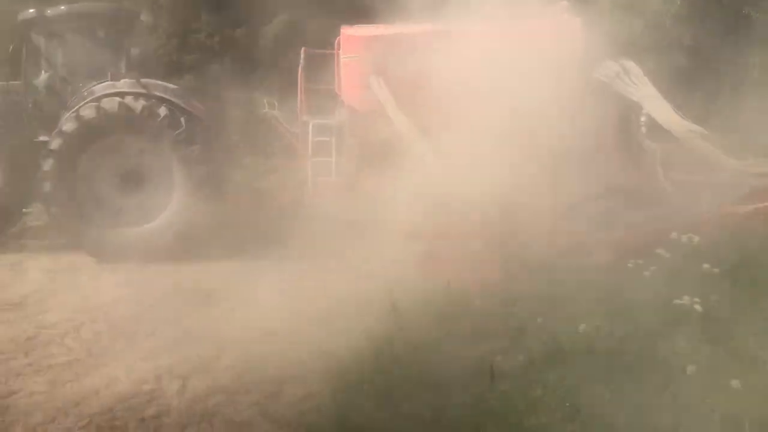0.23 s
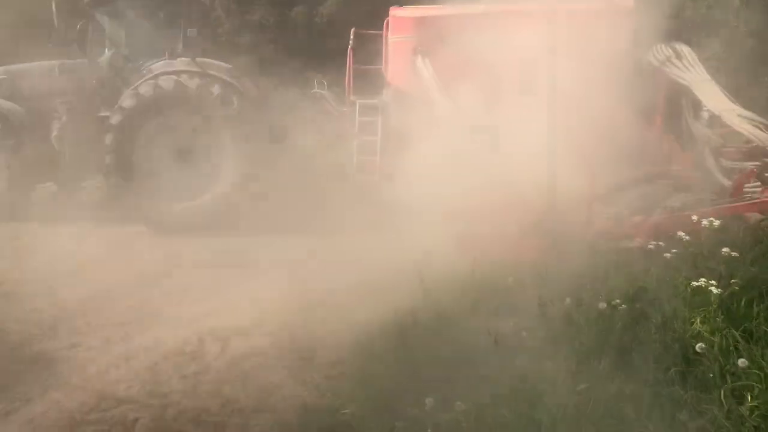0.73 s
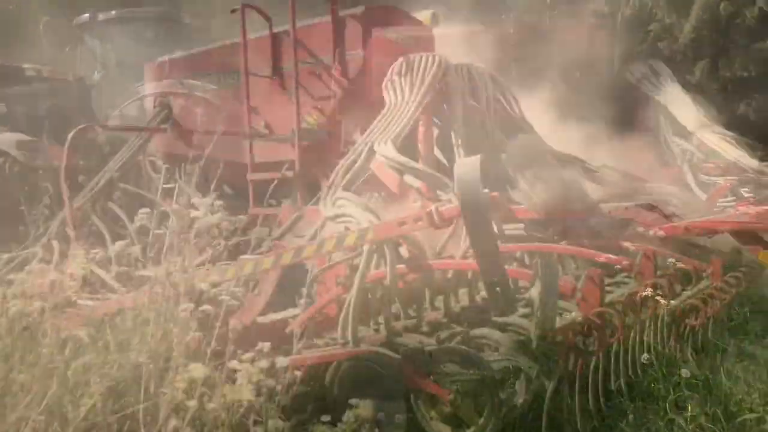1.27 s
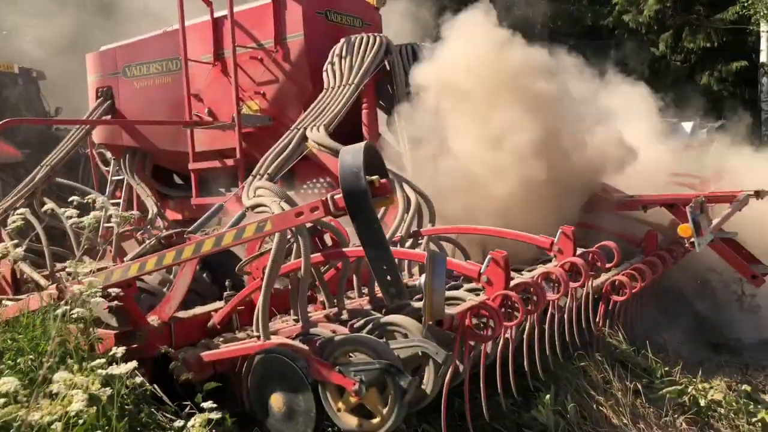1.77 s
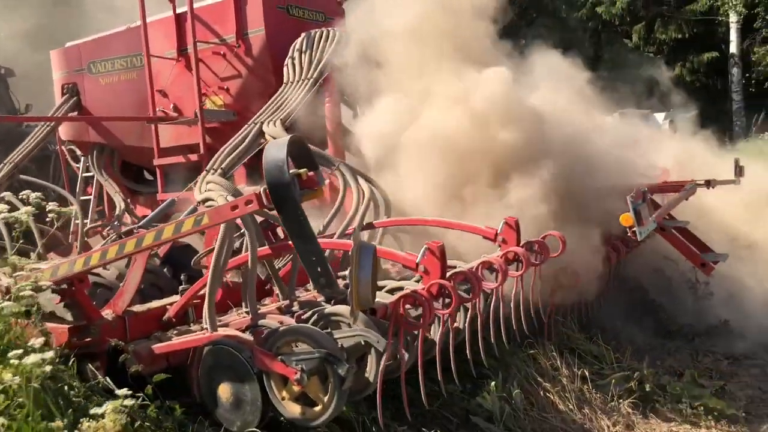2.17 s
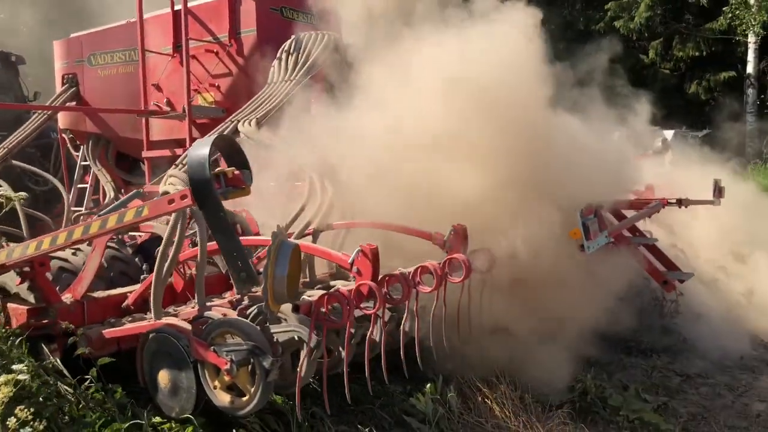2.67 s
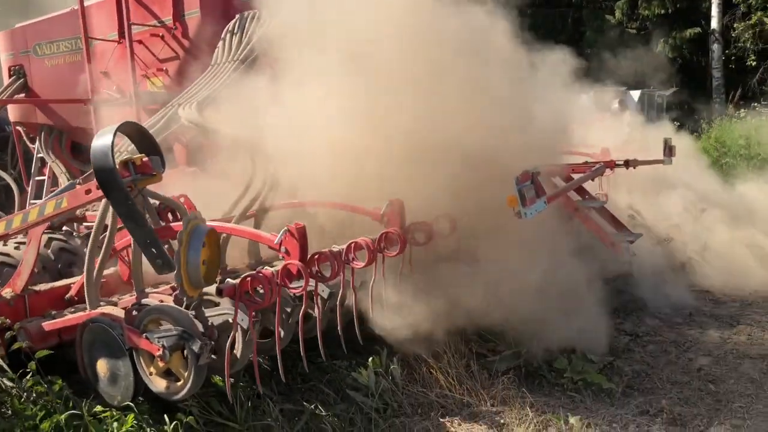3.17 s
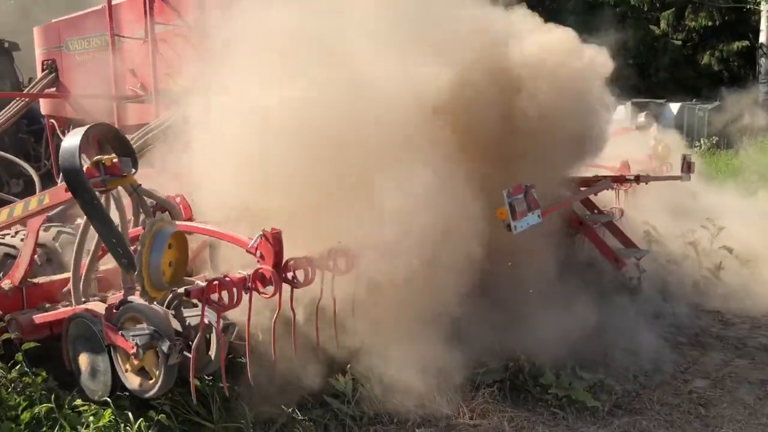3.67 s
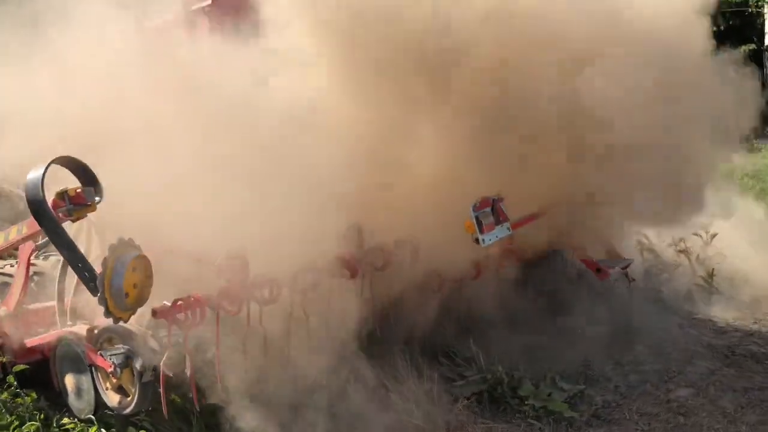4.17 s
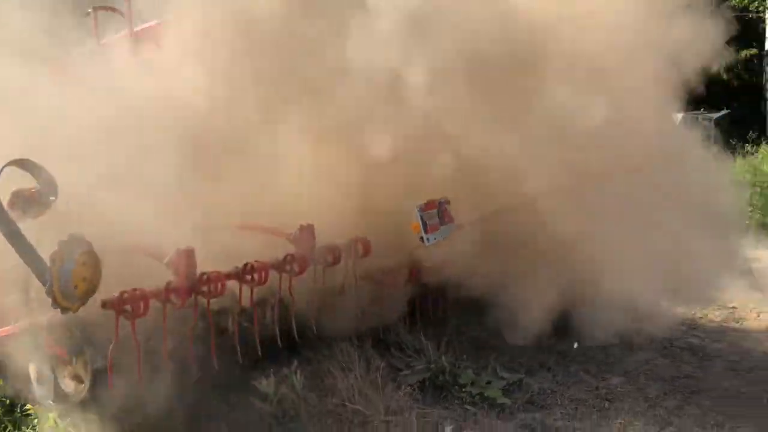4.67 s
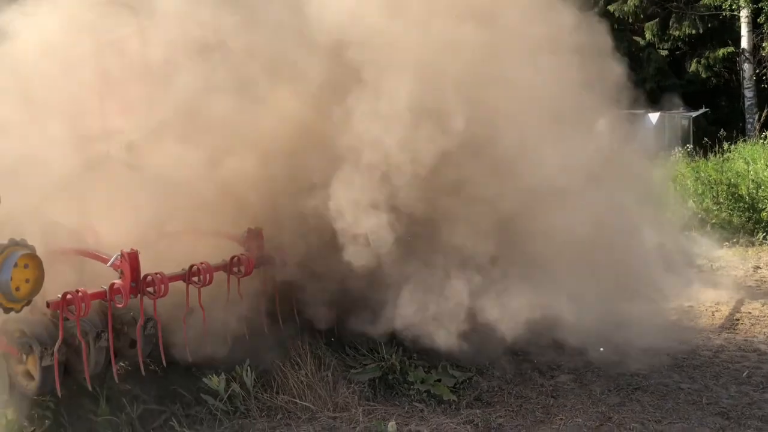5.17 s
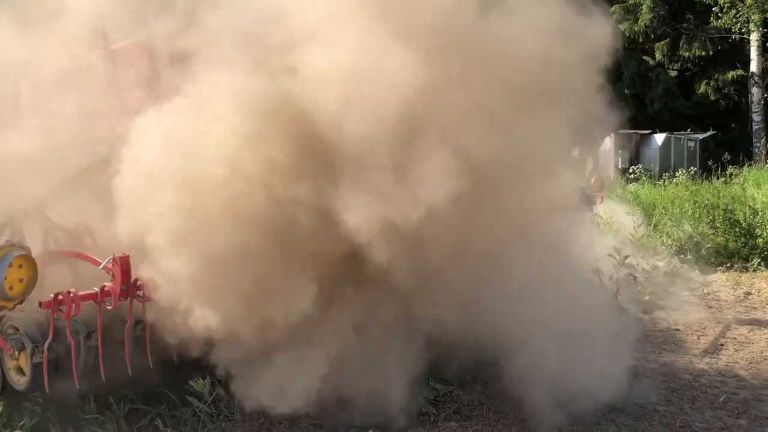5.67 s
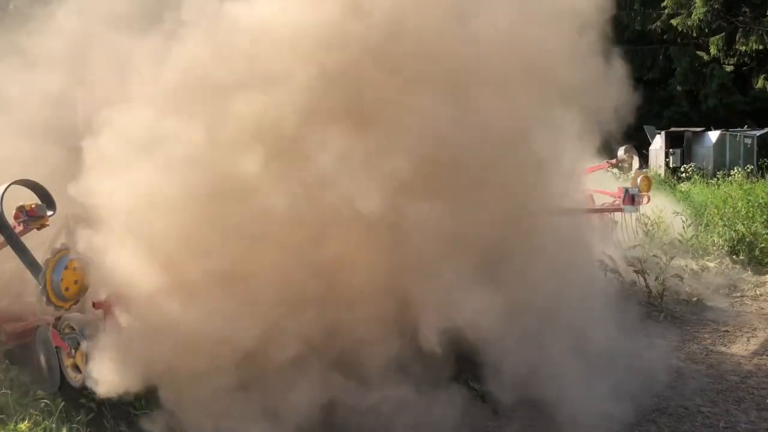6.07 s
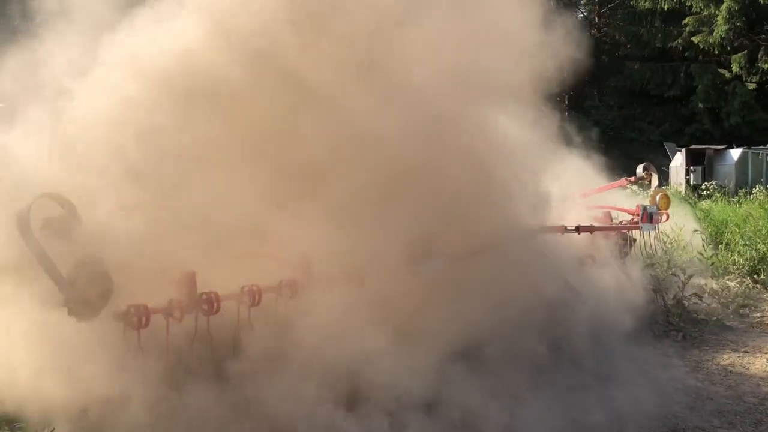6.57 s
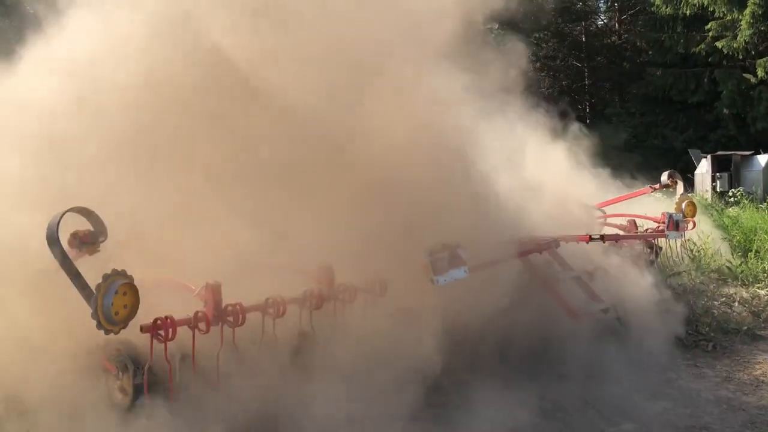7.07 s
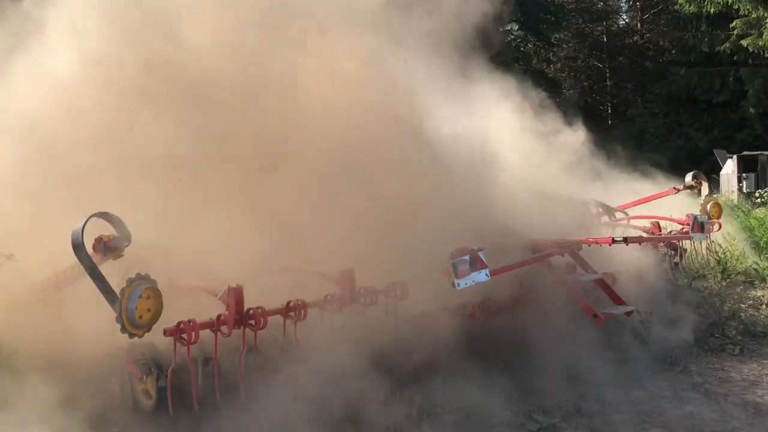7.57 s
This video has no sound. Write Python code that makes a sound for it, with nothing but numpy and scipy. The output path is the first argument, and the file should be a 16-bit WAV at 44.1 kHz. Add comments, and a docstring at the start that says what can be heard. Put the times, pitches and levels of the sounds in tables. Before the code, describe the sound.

A forceful air lance blows dust from farm machinery in the open. Its dense high hiss constantly flickers and sputters, peppered with fine grit ticks, while rapid blasts resonate in metal hollows and low air buffets underneath. The loudest rushes come before five seconds, then shorter puffs and a softer hiss let the steady diesel show through. Close, mono, dry outdoor pickup with compressed peaks.

```python
"""A compressed-air lance hisses throughout, blowing dust off a seed drill outdoors, near a running diesel.
The jet is coloured noise with small ticks of grit; echoes from the machine ripple its sound.
Where it meets the frame it roars in the hollows and splashes on steel, both made of ringing noise.
A tube end whistles faintly, the spent air buffets low down, and the engine is a stack of steady tones.
One microphone hears it all; the recorder turns down loud stretches."""
import sys
import numpy as np
from scipy import signal
from scipy.fft import rfft, irfft, next_fast_len
from scipy.io import wavfile
from scipy.ndimage import uniform_filter1d, minimum_filter1d, map_coordinates

SR = 44100
rng = np.random.default_rng(int(sys.argv[2]) if len(sys.argv) > 2 else 0)


def bounce(signal):
    """Save signal as a 16-bit WAV file at the path given by the first command-line argument."""
    frames = np.transpose(np.atleast_2d(signal))
    limited = np.clip(frames, -1, 1)
    pcm = np.round(limited * 32767).astype(np.int16)
    wavfile.write(sys.argv[1], SR, pcm)


N = 344421
TIME = np.arange(N) / SR  # s
FREQ = np.fft.rfftfreq(N, 1 / SR) + 1e-3  # Hz, kept just above zero so that it can be divided by


def undb(db):
    """Turn decibels into a plain gain."""
    return 10 ** (np.asarray(db) / 20)


def unit(x):
    """Scale to an average strength (rms) of 1."""
    return x / np.std(x)


def controls(table):
    """Join the points of each column with straight lines, sample by sample."""
    s, *columns = np.transpose(table)
    return [np.interp(TIME, s, column) for column in columns]


def shape(x, response):
    """Filter a sound by a response given on FREQ."""
    size = next_fast_len(N + SR // 10)  # spare room for ringing past the end
    gain = np.interp(np.fft.rfftfreq(size, 1 / SR), FREQ, response)
    return irfft(rfft(x, size) * gain, size)[:N]


def colour(points):
    """Response through f/Hz, level/dB points, silent outside them."""
    hz, db = np.transpose(points)
    return undb(np.interp(np.log(FREQ), np.log(hz), db, left=-np.inf, right=-np.inf))


def resonance(hz, width):
    """A resonator lets its own pitch through fully and less and less on either side."""
    return 1 / (1 + 1j * (FREQ / hz - hz / FREQ) * hz / width)


def walk(rate):
    """Smooth chance with spread 1 that changes about rate times a second."""
    return unit(shape(rng.standard_normal(N), np.exp(-(FREQ / rate) ** 2)))


def turbulence(flutter_db, rate):
    """Noise that comes in uneven eddies."""
    return unit(rng.standard_normal(N) * undb(flutter_db * walk(rate)))


def grit(rate, spread_db):
    """Ticks of flying grains, about rate a second: many small, a few large."""
    chance = rng.random(N)
    size = rng.exponential(size=N)
    tick = undb(spread_db * np.minimum(size, 5))
    return unit((chance < rate / SR) * tick * rng.choice([-1, 1], N))


def ring(modes, wander_db):
    """Each resonance is blown by its own eddies and swells as the jet moves over it."""
    out = 0
    for hz, width, db in modes:
        # squared response: steep skirts, dark between the resonances
        voice = unit(shape(rng.standard_normal(N), resonance(hz, 2 * width) ** 2))
        out = out + voice * undb(db + wander_db * walk(12.4))
    return unit(out)


def tuned_hollow(hz, width):
    """A single blown resonance whose pitch moves: slow noise carried on a gliding tone."""
    phase = 2 * np.pi * np.cumsum(hz) / SR
    slow = 1 / (1 + 1j * FREQ / width) ** 2
    in_phase = shape(rng.standard_normal(N), slow)
    quadrature = shape(rng.standard_normal(N), slow)
    return unit(in_phase * np.cos(phase) + quadrature * np.sin(phase))


def swell(start, length, edge_s):
    """Attack, hold and release of one event, from 0 to 1 and back."""
    reach = np.array([start - 8 * edge_s, start + length + 8 * edge_s])
    near = slice(*np.clip(reach * SR, 0, N).astype(int))
    age = TIME[near] - start
    opening = (1 + np.tanh(age / edge_s / 2)) / 2
    closing = (1 + np.tanh((length - age) / edge_s / 2)) / 2
    out = np.zeros(N)
    out[near] = opening * closing
    return out


def events(table, edge_s, edge_share):
    """Gains of a table's main layer and of its relative layers; longer events have softer edges."""
    power = np.zeros((len(table[0][2:]), N))
    for start, length, db, *relative_db in table:
        opening = swell(start, length, edge_s + edge_share * length)
        for layer, layer_db in zip(power, (0, *relative_db)):
            layer += opening * undb(db + layer_db) ** 2
    return np.sqrt(power)


def delayed(x, ms):
    """The sound after a path whose length may change."""
    return map_coordinates(x, [np.arange(N) - ms * SR / 1000], order=3)


# two panels that mirror the hiss: delay/ms when the retreat starts, growth of the delay/(ms per s),
# echo strength (0-1)
MIRRORS = [(.65, .75, .2), (.455, .45, .16)]
RETREAT_START_S, RETREAT_LENGTH_S, RETREAT_EDGE_S = 3.05, 0.4, .015


def panels(x):
    """Two close mirrors: their echoes come later and later as the nozzle draws away."""
    facing = swell(RETREAT_START_S, RETREAT_LENGTH_S, RETREAT_EDGE_S)
    echoes = 0
    for ms, ms_per_s, strength in MIRRORS:
        echoes = echoes + strength * delayed(x, ms + ms_per_s * (TIME - RETREAT_START_S))
    return x + facing * echoes


def scatter(x, echo_db, drift_ms, count):
    """Bars and tines send back weak echoes that shift as the lance moves and ripple the spectrum."""
    paths_ms = np.geomspace(1.1, 9, count) * rng.uniform(.9, 1.1, count)
    echoes = sum(delayed(x, ms + drift_ms * walk(1.8)) for ms in paths_ms)
    return (x + undb(echo_db) * echoes) / np.sqrt(1 + count * undb(echo_db) ** 2)


def eddies(points):
    """One scale of eddies: coloured noise with grit in it, sputtering a little."""
    noise = rng.standard_normal(N) + undb(-17) * grit(rate=390, spread_db=3)
    return unit(shape(noise, colour(points))) * undb(1.27 * walk(20))


# the free jet as the lance is carried along: t/s, hiss level/dB,
# then relative to the hiss: sizzle on top level/dB, lower shoulder level/dB
JET_PATH = [(0, -21.5, -4, -7), (.5, -19.5, -0.5, -12), (.9, -23, -1, -8.5), (1.1, -17, -1.5, -9),
            (1.45, -22.5, -3, -8), (1.84, -24, -15, -1), (1.93, -28, 0, -2.5), (2.17, -19, -5, -5),
            (2.85, -19.5, -5, -5.5), (3.38, -24.5, -3, -4.5), (3.46, -21.5, -8, -6), (3.6, -21.5, -3, -2),
            (4.4, -16, -11, -5.5), (4.8, -22, -8, -6.5), (4.86, -28, -6, -8), (4.97, -25, -8, -8),
            (5.05, -20.5, -8, -3.5), (5.4, -20, -7.5, -8), (5.85, -21.5, -7, -8.5),
            (6.02, -25.5, -2.5, -11), (6.35, -26.5, -4.5, -5.5), (7.45, -29.5, -4, -6),
            (7.81, -24.5, -3.5, -8)]
# the hiss flares where the jet catches an edge: start t/s, length/s, hiss level/dB,
# then relative to it: sizzle level/dB, shoulder level/dB
EDGE_FLARES = [(.14, 0.068, -18.5, -1.5, -13), (.525, 0.047, -19, -9, -16), (.595, 0.06, -15.5, -8, -13),
               (1, .17, -30, -1, -7), (1.41, .03, -25, 2, -10), (1.48, 0.062, -20, 2, -6),
               (1.56, .07, -15.5, -0.5, -5), (1.62, 0.15, -10.5, -5, -12), (1.82, 0.055, -19, -3, -1),
               (2.47, 0.096, -9.5, -8, -13.5), (2.54, 0.16, -10.5, -1, -15), (2.74, 0.077, -15.5, -3, -5.5),
               (3, 0.12, -14, -7, -4.5), (3.1, .16, -9.5, -12, -8), (3.21, 0.033, -20, 3, -14),
               (3.42, .08, -22, -18, -11), (3.65, 0.25, -10, -10, -12), (3.8, 0.41, -9.5, -5, -9),
               (4.22, 0.15, -11.5, -2.5, -10), (4.5, 0.063, -18, -0.5, -13), (4.64, .025, -26, -2, -10),
               (4.7, 0.022, -23, -3, -13), (4.775, 0.024, -25, 2, -12), (5.22, 0.038, -17.5, -7, -10),
               (5.89, .03, -24, -12, -4), (5.965, .025, -18.5, -13, -16), (6.055, 0.072, -23, -5, -4),
               (6.12, .07, -26, -8, 1), (6.5, .12, -26.5, -9, -10)]
# the gap that the jet grazes favours one band: t/s, centre f/Hz, level/dB relative to the hiss
GRAZED_GAP = [(0, 8800, -4), (.3, 8400, -5), (.5, 8300, 3), (.7, 9800, -4), (1.5, 9500, -15),
              (2.3, 7000, -15), (2.52, 8700, -5), (2.9, 7800, -16), (3.1, 8800, 1), (3.2, 7694, -6),
              (3.3, 6900, -6), (3.45, 7200, 5), (3.56, 6300, 4), (3.72, 6700, 2), (3.95, 7500, -12),
              (5.05, 7000, -9), (5.35, 9300, -3), (6.3, 7200, -12), (7.81, 7000, -9)]
# colours of the jet's three scales of eddies, each: f/Hz, level/dB
HISS_COLOUR = [(4500, -15), (5600, -12), (6300, -0.5), (7300, 1), (8800, 0.5), (10300, -2.5), (11500, -10),
               (14000, -33)]
SIZZLE_COLOUR = [(8500, -9.5), (10300, -3.5), (11400, 0.5), (12400, 2), (13600, -4.5), (15000, -5),
                 (16000, -16)]
SHOULDER_COLOUR = [(1500, -18), (3000, -8), (4300, -3), (5000, -2.5), (5700, 3), (6400, 0.5), (8000, -29)]


def jet():
    """Air rushing from the nozzle hisses, flares at edges, and is coloured by a gap and by echoes."""
    hiss_db, sizzle_db, shoulder_db = controls(JET_PATH)
    gap_hz, gap_db = controls(GRAZED_GAP)
    # how softly a flare opens and closes: a fixed part plus a share of its length
    flare, sizzle_flare, shoulder_flare = events(EDGE_FLARES, edge_s=.004, edge_share=.07)
    broad = eddies(HISS_COLOUR)
    sizzle = eddies(SIZZLE_COLOUR)
    shoulder = eddies(SHOULDER_COLOUR)
    # the gap takes its share of the hiss without making it louder
    gap = undb(gap_db) * tuned_hollow(gap_hz, width=1440)
    core = (broad + gap) / np.hypot(1, undb(gap_db))
    air = core * np.hypot(undb(hiss_db), flare)
    air = air + sizzle * np.hypot(undb(hiss_db + sizzle_db), sizzle_flare)
    air = air + shoulder * np.hypot(undb(hiss_db + shoulder_db), shoulder_flare)
    air = air * undb(.5 * walk(45) + .5 * walk(250))  # fine flicker of the level
    return scatter(panels(air), echo_db=-19, drift_ms=.04, count=7)


# the jet's fringe washes over the frame all the time: t/s, roar of the hollows level/dB,
# splash on steel level/dB
STEADY_WASH = [(0, -30, -35), (.8, -32.5, -38.5), (1.17, -33.5, -37), (1.7, -27, -33), (1.94, -32.5, -44),
               (2.2, -27.5, -29.5), (2.6, -28.5, -32.5), (3.2, -28, -24), (3.4, -29.5, -36),
               (3.75, -33, -26.5), (4.2, -34.5, -28.5), (4.75, -31, -36.5), (5.1, -28.5, -28),
               (5.4, -29, -34), (5.9, -36, -42), (6.03, -36, -33.5), (6.45, -37.5, -41.5), (6.55, -32, -34),
               (6.72, -38.5, -42.5), (7.81, -37.5, -40.5)]
WASH_DEEP_DB = -6.5  # deep hollows relative to the wash's roar
# the jet crosses an opening in the frame: start t/s, length/s, roar level/dB,
# then relative to it: deep hollows level/dB, splash level/dB, low thump level/dB
OPENING_BLASTS = [(.07, 0.054, -23.5, -8, -10, -27), (0.167, .06, -23, -6, -14, -18),
                  (0.256, 0.053, -24, -7, -19, -24), (0.536, .11, -33.5, -1.5, -12, -13),
                  (.92, 0.039, -23.5, -4, -6.5, -27), (0.987, 0.11, -23, -9.5, -6, -22),
                  (1.247, 0.22, -26, -14, -5, -30), (1.454, 0.098, -20.5, -11, -8, -26),
                  (1.537, .08, -12, -15.5, -10, -26), (1.632, 0.15, -18, -16, -8, -25),
                  (1.768, 0.066, -16.5, -17, -9, -24), (1.837, 0.052, -24, -12, -3, -18),
                  (2.002, .13, -32.5, -13, -4, -15), (2.136, .17, -27.5, -4.5, 1.5, -15),
                  (2.32, 0.17, -21.5, -9.5, -7.5, -18), (2.653, 0.098, -25, -2, -4, -11),
                  (2.81, 0.049, -29, -21, -9, -22), (2.929, 0.043, -21, -12.5, 0.5, -18),
                  (2.969, 0.062, -17, -17, -14, -20), (3.017, 0.065, -22.5, -2.5, -4, -16),
                  (3.41, 0.094, -29.5, 6.5, -3, -22), (3.53, 0.12, -34.5, 6, -1, -8),
                  (4.27, .12, -31.5, -2, -5, -10), (4.41, 0.048, -23, -9, -8, -25),
                  (4.488, 0.072, -20.5, -9.5, -9, -20), (4.64, 0.065, -28.5, 0, -9, -18),
                  (4.72, 0.097, -30, 1, -12, -15), (4.86, 0.024, -20.5, -5, -3.5, -27),
                  (4.92, .15, -24, -13, -2, -28), (5.08, 0.048, -19.5, -20, -5, -26),
                  (5.135, 0.087, -28, -4, -5, -14), (5.226, 0.045, -22, -6, 0.5, -19),
                  (5.444, .06, -28.5, -4, 3, -23), (5.52, 0.077, -20, -8, -10, -24),
                  (5.618, 0.14, -32.5, 4, 3.5, -6), (5.724, 0.11, -21.5, -1, -6, -22),
                  (5.866, 0.099, -22, -4, -6.5, -15), (6.12, 0.087, -27, -5, -3, -31),
                  (6.35, 0.02, -25, -7, -13, -4), (6.39, .03, -30, -13, -5, -15),
                  (6.465, 0.042, -28, -2, -14, -8), (6.605, 0.033, -27, -8, -19, -14),
                  (6.802, 0.066, -23.5, -7, -12, -12), (7.045, .06, -26.5, -12, -17, -10),
                  (7.276, 0.072, -25, -7, -11.5, -6), (7.715, 0.062, -29, -4, -11, -10)]
# pitch of the two hollows that the nozzle points into: t/s, small one f/Hz, deep one f/Hz
AIMED_HOLLOWS = [(0, 1228, 560), (.6, 1205, 697), (1.3, 1199, 640), (1.6, 1316, 739), (2.3, 1031, 630.3),
                 (3.45, 1057, 568.6), (4.7, 1158, 564.6), (5.15, 1188, 672), (5.55, 1172, 630),
                 (5.78, 1057, 761), (5.95, 1079, 688.4), (7.81, 1090, 740)]
# resonances of the frame, each: f/Hz, width/Hz (doubled in ring, where squaring narrows it), level/dB
SMALL_MODES = [(945, 157, 0), (1043, 106, 1), (1151, 45, -2.5), (1249, 52, 0.5), (1424, 103, -0.5)]
DEEP_MODES = [(468, 124, -3.5), (559, 124, -1), (735, 103, 0)]
PLATE_MODES = [(1825, 166, 3.3), (2084, 83, -0.79), (2416, 220, 1), (2637, 220, -0.5), (3250, 330, -0.54)]
# upper resonances that speak only in the blasts, same columns: f/Hz, width/Hz, level/dB
UPPER_MODES = [(1464, 100, 6.5), (1790, 97, 10.5)]
OVERBLOWN_DB = -10  # relative to a blast's roar
# the deep hollow's own note at full aim (dB), and the least share of it (0-1) that always sounds
SINGING_DB, WASH_SINGING = 5, 0.33


def strike():
    """The jet breaks up on the frame, in blasts over a wash; one flapping shakes hollows and plates."""
    roar_db, splash_db = controls(STEADY_WASH)
    small_hz, deep_hz = controls(AIMED_HOLLOWS)
    blast, deep_blast, splash_blast, thump = events(OPENING_BLASTS, edge_s=0.0012, edge_share=0.066)
    roar = np.hypot(undb(roar_db), blast)
    flap = unit(walk(24) + 0.54 * walk(106))

    small_note = undb(-3.0) * tuned_hollow(small_hz, width=98)
    small = unit(ring(SMALL_MODES, wander_db=1.5) + small_note) * roar
    upper = ring(UPPER_MODES, wander_db=4.0) * undb(OVERBLOWN_DB) * blast

    # the more of the jet goes into the deep hollow, the clearer its note
    deep_share = deep_blast / np.hypot(roar, deep_blast)
    singing = undb(SINGING_DB) * np.maximum(deep_share, WASH_SINGING)
    deep = unit(ring(DEEP_MODES, wander_db=2.2) + singing * tuned_hollow(deep_hz, width=55))
    deep = unit(deep / np.hypot(1, singing))  # a clearer note, not a louder one
    deep = deep * np.hypot(undb(roar_db + WASH_DEEP_DB), deep_blast)

    splash = ring(PLATE_MODES, wander_db=2.5) * np.hypot(undb(splash_db), splash_blast)
    low = unit(shape(rng.standard_normal(N), resonance(200, 295) ** 2)) * thump
    return (small + upper + deep + low) * undb(0.85 * flap) + splash * undb(0.77 * flap)


# a tube end that the jet blows across: t/s, f/Hz, level/dB
TUBE_NOTE = [(0, 2670, -41), (.25, 2720, -39), (.6, 2750, -42), (.88, 2680, -42), (1.02, 2604, -26.5),
             (1.12, 2550, -36), (1.5, 2560, -80)]


def tube():
    """Air blown across a tube's open end makes a breathy, half-formed whistle."""
    hz, db = controls(TUBE_NOTE)
    return tuned_hollow(hz, width=180) * undb(db + 1.5 * walk(30))


# strength of the spent air's buffeting: t/s, level/dB
SPENT_AIR_LEVEL = [(0, -46), (.25, -38.5), (1.05, -45.5), (1.15, -53), (1.38, -55), (1.5, -43), (1.95, -46),
                   (2.22, -40.5), (2.88, -44), (3.02, -41), (3.68, -36.5), (3.85, -44), (4.15, -45),
                   (4.52, -37), (4.75, -44), (5.52, -43), (5.62, -39), (5.95, -44), (6.06, -52),
                   (6.28, -35), (6.7, -41), (7.15, -43.5), (7.81, -37.5)]
# its colour: f/Hz, level/dB
BUFFET_COLOUR = [(30, -30), (55, -15), (85, -3), (150, 5), (220, 5.5), (340, 3.5), (480, -3), (800, -14)]


def spent_air():
    """The slowed air tumbles away under the machine with a low buffeting."""
    buffet_db, = controls(SPENT_AIR_LEVEL)
    buffet = shape(turbulence(flutter_db=3.0, rate=23), colour(BUFFET_COLOUR))
    return unit(buffet) * undb(buffet_db)


# the engine as heard, its exhaust note strongest while the tractor side is open:
# t/s, hum level/dB, exhaust level/dB
ENGINE_LEVEL = [(0, -47, -45), (.3, -44, -40.5), (1.1, -44.5, -39.5), (1.5, -46, -52.5), (3.6, -46.5, -51),
                (4.2, -48.5, -54), (4.8, -50, -55), (5.15, -45.5, -47), (6.25, -44, -45.5),
                (7.81, -44.5, -45)]
# engine tones, each: multiple of the shaft rate, level/dB relative to the hum or to the exhaust note
HUM_TONES = [(2, -2.5), (3, -4.5), (4, -13), (6, -15), (7, -4.5), (8, -6), (9, -13)]
EXHAUST_TONES = [(5, -3), (14, -11.5)]
SHAFT_HZ = 19.85  # average turns per second


def engine():
    """A steady diesel: tones at whole multiples of a shaft rate that wavers very slightly."""
    hum_db, exhaust_db = controls(ENGINE_LEVEL)
    turns = np.cumsum(SHAFT_HZ * (1 + .003 * walk(3))) / SR
    # the wind carries the exhaust note unevenly, the deep hum less so
    hum_db = hum_db + .4 * walk(12)
    exhaust_db = exhaust_db + 1.6 * walk(10)
    out = 0
    for tones, level_db in ((HUM_TONES, hum_db), (EXHAUST_TONES, exhaust_db)):
        lines = 0
        for multiple, db in tones:
            # whole multiples, each tone starting at a random point of its cycle
            lines = lines + undb(db) * np.sin(2 * np.pi * (round(multiple) * turns + rng.random()))
        out = out + np.sqrt(2) * lines * undb(level_db)
    return out


def scene():
    """All sources reach one microphone, the same in both channels."""
    mono = jet() + strike() + tube() + spent_air() + engine()
    return np.array([mono, mono])


# narrow dips in the microphone's response: f/Hz, width/Hz, depth (0-1)
RESPONSE_DIPS = [(1643, 540, 0.61), (3840, 770, 0.66)]
# gain control: level it holds the sound under (dB), and how long it averages (s)
HOLD_DB, AVERAGE_S = -8, 0.041
CEILING, TOP_HZ = .93, 15800  # peak limit before the top is cut (full scale 1), and where it is cut


def record(dry):
    """The microphone has two dips; the recorder eases loud stretches, limits peaks and cuts the top."""
    response = 1
    for hz, width, depth in RESPONSE_DIPS:
        response = response * (1 - depth * resonance(hz, width))
    heard = np.array([shape(channel, response) for channel in dry])

    power = uniform_filter1d(np.mean(heard ** 2, axis=0), size=int(AVERAGE_S * SR))
    heard = heard / np.sqrt(1 + power / undb(HOLD_DB) ** 2)

    allowed = CEILING / np.maximum(np.abs(heard).max(axis=0), CEILING)
    # hold each dip of the gain around its peak, then smooth it
    gain = uniform_filter1d(minimum_filter1d(allowed, size=129), size=129)
    top_cut = signal.ellip(10, .05, 60, TOP_HZ, fs=SR, output="sos")
    return signal.sosfiltfilt(top_cut, heard * gain)


dry = scene()
out = record(dry)
bounce(out)
```